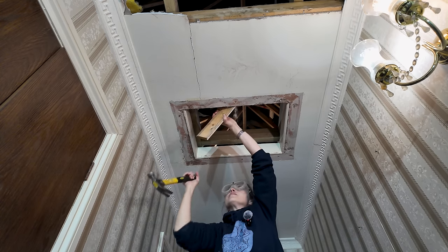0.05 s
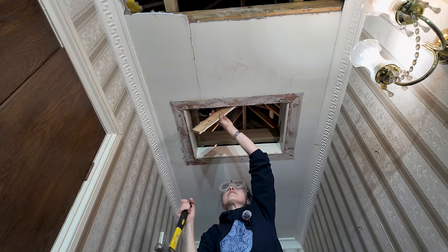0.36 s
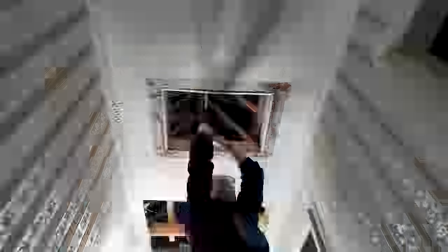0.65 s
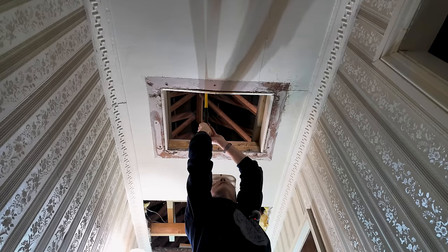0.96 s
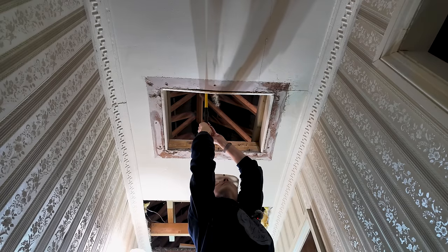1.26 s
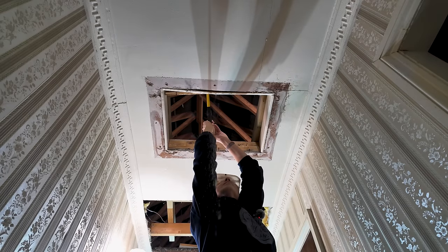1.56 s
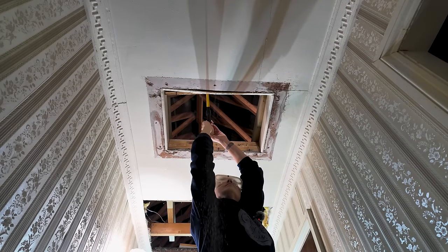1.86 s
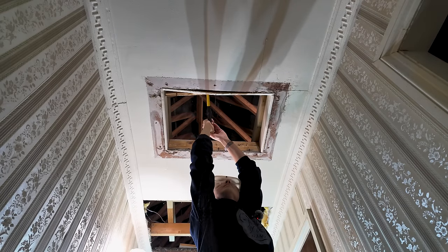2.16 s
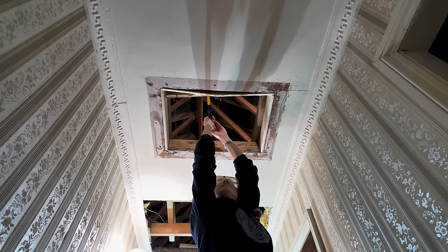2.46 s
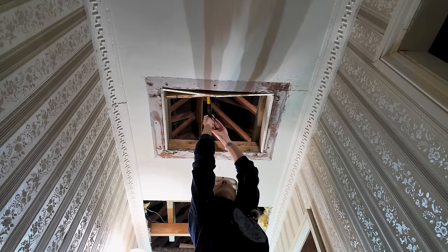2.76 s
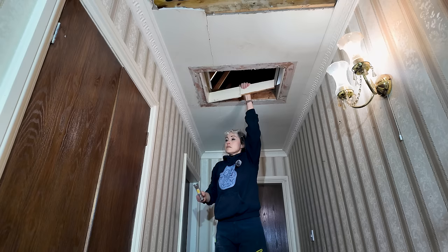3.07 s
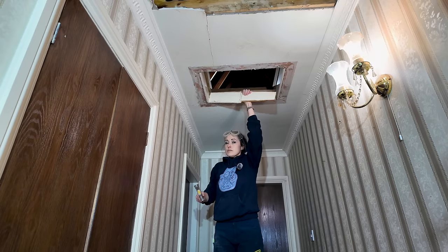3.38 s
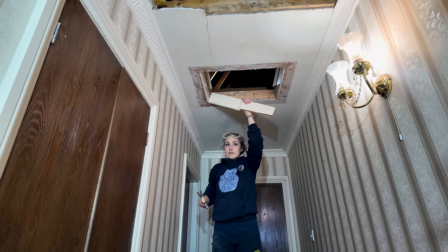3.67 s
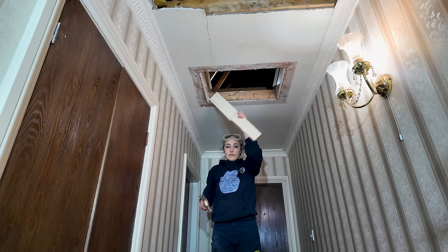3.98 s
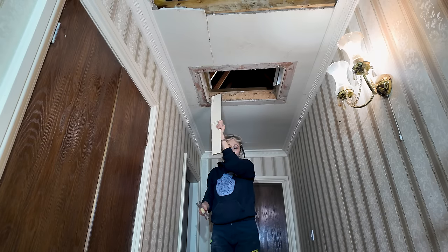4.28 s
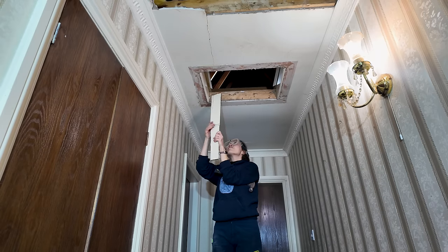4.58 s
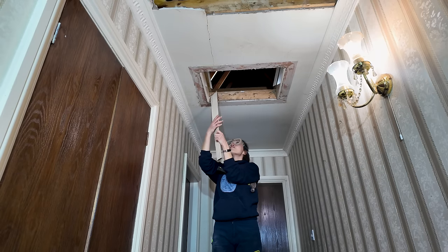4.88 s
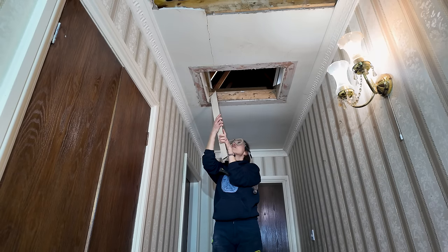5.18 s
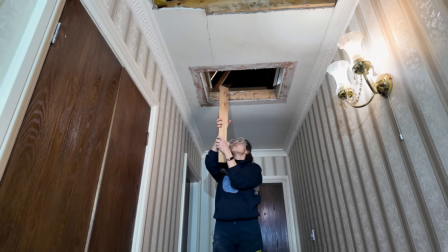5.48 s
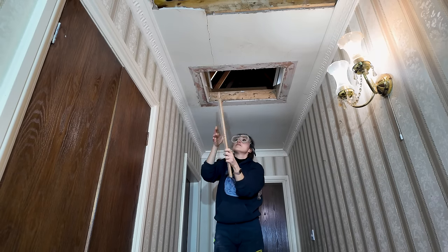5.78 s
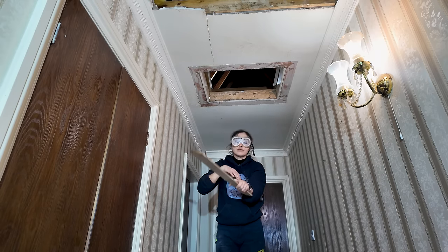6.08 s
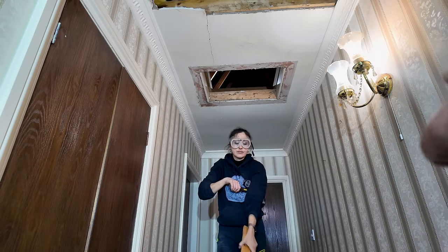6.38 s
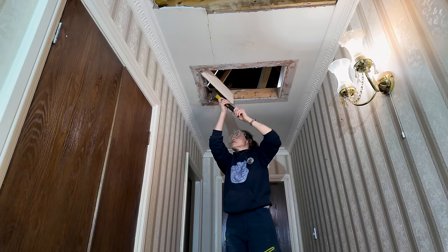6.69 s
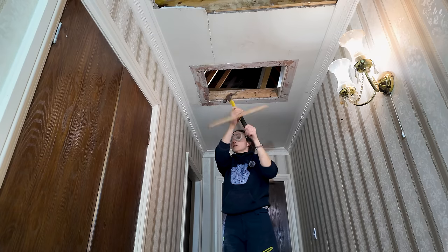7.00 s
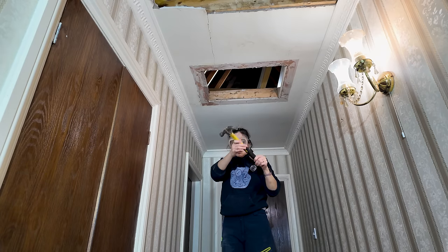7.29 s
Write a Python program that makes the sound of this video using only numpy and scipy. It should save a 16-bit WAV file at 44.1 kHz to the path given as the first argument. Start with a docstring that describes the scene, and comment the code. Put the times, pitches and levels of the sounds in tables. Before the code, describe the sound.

Nails and wood tick as a steel claw scrapes and levers at a ceiling hatch, building to a run of loud splintering cracks. The ticking resumes until the board drags loose with a brief shudder. Hollow wooden knocks and light sliding follow, then a quick ringing clatter and a small squeak on the rim. Everything echoes briefly in a tight, quiet hallway, except for soft sleeve rustles and bumps close to the microphone.

```python
"""In a narrow hallway, a claw hammer prises nailed timber out of a ceiling hatch.
The claw scrapes, the strained wood ticks, then it lets go in sharp cracks that shake the joists.
The freed board judders out, slides, is knocked about, and clatters and squeaks on the hatch rim.
The close walls echo all this; a sleeve rustles nearby over a faint hush of air."""
import sys
import numpy as np
from scipy import signal
from scipy.fft import rfft, irfft, next_fast_len
from scipy.io import wavfile
from scipy.ndimage import uniform_filter1d

SR = 44100
rng = np.random.default_rng(int(sys.argv[2]) if len(sys.argv) > 2 else 0)


def log_audio(samples):
    """Write samples as a 16-bit WAV file to the path given in sys.argv[1]."""
    # one column per channel
    frames = np.atleast_2d(samples).T
    # limit to full scale, then quantise
    limited = np.clip(frames, -1, 1)
    pcm = np.round(limited * 32767).astype(np.int16)
    wavfile.write(sys.argv[1], SR, pcm)


N = 323694
TIME = np.arange(N) / SR


def from_db(db):
    """Turn decibels into a number to multiply by."""
    return 10 ** (np.asarray(db) / 20)


def rms_one(x):
    """Scale a sound so its average strength (rms) is 1."""
    return x / np.sqrt(np.mean(x ** 2) + 1e-20)


def at_hz(points, hz):
    """Read between the rows of a table, with octaves evenly spaced."""
    pitches, values = np.transpose(points)
    return np.interp(np.log(hz + 1), np.log(pitches), values)


def add(track, start_s, sound):
    """Mix a sound into a track at the given time."""
    start = round(start_s * SR)
    track[start:start + len(sound)] += sound[:N - start]


def causal(db, size):
    """A spectrum with these levels that makes no sound before the blow (minimum phase)."""
    cepstrum = irfft(np.log(from_db(db)), size)
    cepstrum[1:size // 2] *= 2
    cepstrum[size // 2 + 1:] = 0
    return np.exp(rfft(cepstrum))


def coloured(x, colour):
    """Give a sound a colour, meaning a balance of low and high pitches, at strength 1."""
    size = next_fast_len(N)
    gains = from_db(at_hz(colour, np.fft.rfftfreq(size, 1 / SR)))
    return rms_one(irfft(rfft(x, size) * gains, size)[:N])


def ring(x, tones):
    """An object shaken by x rings at its own tones; each takes ring_s to fade by 60 dB."""
    out, x = 0, x + 1e-15 * rng.standard_normal(len(x))
    for hz, db, ring_s in tones:
        decay = from_db(-60 / (ring_s * SR))
        feedback = [1, -2 * decay * np.cos(2 * np.pi * hz / SR), decay ** 2]
        out = out + from_db(db) * (1 - decay ** 2) / 2 * signal.lfilter([1, 0, -1], feedback, x)
    return out


def strokes(rows, sharpness, level_column=0):
    """Loudness over time for rubbing strokes that each swell and fade."""
    power = np.zeros(N)
    for start_s, swell_s, fade_s, *levels_db in rows:
        effort = np.interp(TIME, start_s + np.cumsum([0, swell_s, fade_s]), [0, 1, 0])
        power += (from_db(levels_db[level_column]) * np.sin(np.pi / 2 * effort) ** sharpness) ** 2
    return np.sqrt(power)


def patches(per_s, depth_db):
    """Loudness that wanders as the pressure of a rub comes and goes."""
    pressure = rng.standard_normal(1000)
    return rms_one(from_db(depth_db * np.interp(TIME * per_s, np.arange(len(pressure)), pressure)))


def friction(colour, per_s, spread_db, smooth):
    """Surfaces stick and slip: tiny catches of uneven size over a smooth rub."""
    sizes = from_db(spread_db * np.minimum(rng.exponential(1, N), 4)) * rng.choice([-1, 1], N)
    catches = rms_one(sizes * (rng.random(N) < per_s / SR))
    return coloured(catches + smooth * rng.standard_normal(N), colour)


# colour of the background hush: pitch_hz, level_db
HUSH_COLOUR = [(25, -22), (60, -10), (120, -8), (330, 1), (700, -10.5), (1400, -24), (2800, -22),
               (8000, -28.5), (15000, -49.5)]


def air(level_db=-72):
    """The air in the hallway makes a faint, steady hush."""
    return from_db(level_db) * coloured(rng.standard_normal(N), HUSH_COLOUR)


# how long the echo takes to fade by 60 dB: pitch_hz, ring_s
ECHO_TIMES = [(100, 0.57), (260, 0.64), (700, 0.44), (1800, 0.45), (4800, 0.36), (12000, 0.46)]
# colour of the echo: pitch_hz, level_db
ECHO_COLOUR = [(80, 0), (300, 1), (1000, -3.5), (2500, -2), (7000, -7.5), (13000, -12.5), (16000, -17)]


def hallway(x, gap_s=0.002, build_s=0.0046, attic_db=-24, attic_ring_s=0.44, bands=18):
    """Echoes crowd between close walls and die away, with a faint tail from the attic."""
    t, hz = np.arange(SR) / SR, np.fft.rfftfreq(SR, 1 / SR)
    noise, centres = rfft(rng.standard_normal(SR)), np.geomspace(60, 16000, bands)
    onset = 1 - np.exp(-np.maximum(t - gap_s, 0) / build_s)
    attic = from_db(attic_db - 60 * t / attic_ring_s)
    echo = np.zeros(SR)
    for centre, weights in zip(centres, np.eye(bands)):
        share = at_hz(list(zip(centres, weights)), hz)   # picks out one band of pitches
        walls = from_db(-60 * t / at_hz(ECHO_TIMES, centre))
        band = irfft(noise * share, SR) * onset * (walls + attic)
        gain = np.sqrt(np.mean(share ** 2)) * from_db(at_hz(ECHO_COLOUR, centre))
        echo += gain * band / np.linalg.norm(band)
    return signal.fftconvolve(x, echo)[:N]


# arm movements that stir the sleeve: start_s, swell_s, fade_s, rumble_db, swish_db
ARM_MOVES = [(4.1, 0.022, 0.13, -58, -57), (4.19, 0.13, 0.059, -54.5, -61.5),
             (4.43, 0.042, 0.19, -62.5, -81.5), (4.6, 0.19, 0.31, -59, -70.5), (5.03, 0.12, 0.33, -59, -67),
             (5.58, 0.16, 0.41, -65, -68), (5.96, 0.23, 0.9, -63.5, -56.5), (6.28, 0.2, 0.089, -69, -63.5),
             (6.85, 0.07, 0.2, -73.5, -72), (7.12, 0.34, 0.17, -78.5, -72)]
# colours of the cloth's rumble and swish: pitch_hz, level_db
CLOTH_RUMBLE = [(25, 0), (55, 24), (130, 19.5), (300, 17), (700, -33)]
CLOTH_SWISH = [(120, -35), (200, -18), (245, -16), (278, 0), (311, -5), (538, 0), (1000, -9), (2910, -15),
               (7010, -23), (13100, -38), (16000, -52)]
# dull bumps of cloth and hands: start_s, peak_db, pitch_hz
SOFT_BUMPS = [(4.47, -44, 170), (4.727, -42, 210), (4.776, -41.5, 220.5), (5.075, -36.5, 300),
              (5.267, -38, 262), (5.799, -45, 170.5), (6.053, -41.5, 300), (6.22, -24.5, 310),
              (6.236, -32, 284)]


def sleeve(undertone_ratio=0.37, bump_s=0.0036, rise_s=0.003):
    """Moving cloth rumbles and swishes, and now and then bumps with a short, dull throb."""
    rumble = strokes(ARM_MOVES, sharpness=0.75) * patches(per_s=22, depth_db=2.0)
    rumble *= coloured(rng.standard_normal(N), CLOTH_RUMBLE)
    swish = friction(CLOTH_SWISH, per_s=2800, spread_db=5.0, smooth=0.91)
    cloth = rumble + from_db(2.5) * strokes(ARM_MOVES, sharpness=1.0, level_column=1) * swish
    t = np.arange(SR // 10) / SR
    for start_s, peak_db, pitch_hz in SOFT_BUMPS:
        phase = 2 * np.pi * pitch_hz * t
        throb = np.sin(phase) - 0.89 * np.sin(undertone_ratio * phase)
        throb *= (1 - np.exp(-t / rise_s)) * np.exp(-t / bump_s)
        add(cloth, start_s, from_db(peak_db) * throb / np.abs(throb).max())
    return cloth


# the board sliding over timber and hands, and squeaking, then a faint, bright closing rustle: start_s, swell_s,
# fade_s, level_db
SLIDE_STROKES = [(0.0, 0.0017, 0.088, -53.5), (0.065, 0.021, 0.09, -49), (0.245, 0.0074, 0.056, -53.5),
                 (0.39, 0.013, 0.074, -52), (0.55, 0.069, 0.083, -40.5), (4.6, 0.013, 0.024, -67),
                 (4.7, 0.038, 0.08, -64.5), (4.8, 0.08, 0.09, -63.5), (5.18, 0.072, 0.066, -54.5),
                 (6.98, 0.27, 0.25, -64.5)]
SQUEAK_STROKES = [(6.81, 0.078, 0.1, -56)]
# colour of the rub: pitch_hz, level_db
RUB_COLOUR = [(47, -46), (80, -25), (108, -5.5), (257, -11), (355, -2.5), (387, -8), (471, -11.5),
              (637, -6.5), (920, -3.5), (1240, -11.5), (1920, -16), (2280, -12), (4750, -17), (9290, -19.5),
              (14000, -46)]
# tones of the slide and of the squeak: pitch_hz, level_db, ring_s
SLIDE_TONES = [(468, 9.5, 0.067), (945, -6.5, 0.025), (1220, 4.5, 0.084), (2196, -7.5, 0.011),
               (4330, 1, 0.043), (9760, -8.5, 0.005)]
SQUEAK_TONES = [(1139, 2, 0.15), (2400, -25, 0.038), (3270, -15, 0.049), (4500, -17, 0.004)]


def sliding_board():
    """The board rubs along with a hollow tone, and squeaks where it is pressed on the rim; a faint, bright
    rustle closes the scene."""
    rub = from_db(-7) * strokes(SLIDE_STROKES, sharpness=1.6)
    rub *= friction(RUB_COLOUR, per_s=4000, spread_db=5.0, smooth=1.0)
    squeak = from_db(-2) * strokes(SQUEAK_STROKES, sharpness=2.0)
    squeak *= rms_one(ring(rng.standard_normal(N), SQUEAK_TONES))
    return rub + ring(rub, SLIDE_TONES) + squeak


# loudness of the freed board as it is dragged out: time_s, level_db
GROAN_LEVELS = [(4.045, -57), (4.06, -42), (4.12, -32.5), (4.135, -44), (4.2, -54.5), (4.365, -52.5),
                (4.38, -100)]
# the tones it groans with: pitch_hz, level_db, ring_s
GROAN_TONES = [(119.5, -5, 0.17), (208.2, 9, 0.12), (297, 9, 0.15), (378, 1.5, 0.3), (640, -22, 0.26)]


def juddering_board(slips_per_s=98, jitter=0.086, count=48):
    """The board catches and slips in quick succession, and each slip rings its low tones."""
    slips = np.zeros(N)
    times = GROAN_LEVELS[0][0] + np.cumsum(1 + jitter * rng.standard_normal(count)) / slips_per_s
    slips[(times * SR).astype(int)] = 1
    groan = signal.sosfilt(signal.butter(2, 1500, fs=SR, output="sos"), ring(slips, GROAN_TONES))
    groan = rms_one(groan) * np.sqrt(count / slips_per_s / TIME[-1])   # strength 1 while it sounds
    return from_db(np.interp(TIME, *np.transpose(GROAN_LEVELS))) * groan


# the claw and nails scraping on wood, with a loud splintering tear just before a crack at 1.6 s: start_s,
# swell_s, fade_s, level_db
CLAW_STROKES = [(0.32, 0.032, 0.049, -65.5), (0.45, 0.089, 0.044, -62.5), (0.74, 0.12, 0.099, -54.5),
                (1.02, 0.18, 0.034, -53.5), (1.45, 0.041, 0.15, -55.5), (1.605, 0.047, 0.11, -29.5),
                (1.96, 0.04, 0.22, -70), (2.25, 0.19, 0.036, -55.5), (3.08, 0.14, 0.17, -58.5),
                (3.33, 0.12, 0.1, -66), (3.85, 0.028, 0.036, -53), (3.88, 0.088, 0.12, -43.5),
                (4.07, 0.063, 0.12, -50)]
# colour of the scrape: pitch_hz, level_db
CLAW_COLOUR = [(88, -34), (150, -7.5), (383, -2), (566, -5), (1900, -6.5), (3550, 0), (3840, -8),
               (4760, -7), (5680, -1), (7320, -5), (9440, -9), (11700, -19), (16000, -37.5)]


def claw():
    """Steel dragging on wood fibres crackles in uneven patches; once the fibres splinter loudly just before a
    crack."""
    crackle = friction(CLAW_COLOUR, per_s=1400, spread_db=3.6, smooth=0.5)
    pressure = strokes(CLAW_STROKES, sharpness=3.1) * patches(per_s=120, depth_db=1.0)
    return from_db(0.5) * pressure * crackle


# colour of the timber under any blow: pitch_hz, level_db
WOOD_COLOUR = [(40, -28.5), (90, -13.5), (150, -5.5), (330, 1), (800, 0), (1150, -3.5), (2000, -4),
               (2850, 0), (3300, -1), (4450, 1.5), (5300, 4.5), (6500, 6.5), (9000, 1.5), (11000, -3.5),
               (16000, -24)]


def blows(rows, contact, tones, note_db, note_cycles, splinter_s, note_growth=0):
    """A blow is a spike, tearing fibres and a dull shudder. Gives direct sound and sound to echo."""
    size, spike = 16384, 0.31
    shudder_s, shudder_hz, fastest_hz = 0.011, 1000, 6500
    t, hz = np.arange(size) / SR, np.fft.rfftfreq(size, 1 / SR)
    direct, to_room = np.zeros(N), np.zeros(N)
    octaves = np.log2(np.clip(hz, 220, 9500) / 1500)   # harder contact: more treble, less bass
    bass = 1 / (1 + (hz / 350) ** 2)   # where shaken joists thud
    colour_db = at_hz(contact, hz) + at_hz(WOOD_COLOUR, hz)
    # as a bend travels through wood, the treble arrives first and the bass trails
    slowness = np.maximum(np.sqrt(1000 / (hz + 300)) - np.sqrt(1000 / fastest_hz), 0)
    fade = np.minimum(1, np.linspace(3, 0, size)) ** 2
    for start_s, level_db, brightness, pitch_hz, travel_ms, room_db, thud_db in rows:
        bursts = [rng.standard_normal(size) * np.exp(-t / life) for life in (splinter_s, shudder_s)]
        fibres, shudder = (rfft(rms_one(burst)) / np.sqrt(size) for burst in bursts)
        force = spike + fibres + 2 * shudder / (1 + 1j * hz / shudder_hz) ** 2
        force /= np.sqrt(uniform_filter1d(np.abs(force) ** 2, size // 48))   # even out broad humps
        wood = causal(level_db + brightness * octaves + thud_db * bass + colour_db, size)
        lag = np.cumsum(travel_ms / 1000 * slowness) * SR / size
        wood *= np.exp(-2j * np.pi * lag)
        # the struck piece sings on at its own pitch; note_growth makes hard blows sing more
        cycles = note_cycles * (pitch_hz / 200) ** 0.25
        sing_db = note_db + note_growth * level_db + 10 * np.log10(cycles / np.log(1000))
        note = [(pitch_hz, sing_db, cycles / pitch_hz)]
        # the room gathers sound from all directions, so it gets a smoother spectrum
        gathered = causal(10 * np.log10(np.abs(force) + 1e-3), size) * from_db(room_db)
        for track, push in ((direct, force), (to_room, gathered)):
            sound = irfft(wood * push, size)
            add(track, start_s, (sound + ring(sound, note)) * fade)
    return direct + ring(direct, tones), to_room


def same_spot(rows, travel_ms, room_db, thud_db=0):
    """Blows at one spot share their path through the wood, their echo level and their thud."""
    return [(*row, travel_ms, room_db, thud_db) for row in rows]


# knocks on the board: start_s, level_db, brightness_db_per_octave, pitch_hz
KNOCK_HITS = [(0.251, -25, -4, 390), (0.406, -28, 2.5, 1030), (4.441, -31.5, -3.5, 338),
              (4.633, -26, -0.5, 850), (4.867, -23, -3, 850), (5.074, -24.5, -3.5, 329),
              (5.25, -18.5, 2, 370), (5.387, -21, 1, 344), (5.476, -3, -6.5, 353), (5.485, 4, -3, 793),
              (5.926, -27, 4, 1100), (5.993, -30.5, 9, 360), (6.003, -24.5, 2.5, 370)]
# colour of a knock: pitch_hz, level_db
KNOCK_COLOUR = [(220, -1), (700, 5), (1500, -0.5), (3100, -1), (4500, -12), (9500, -21), (15000, -26)]
# the board's own tones: pitch_hz, level_db, ring_s
BOARD_TONES = [(216, -41, .3), (347, 9, 0.17), (452, 7, 0.32), (517, -1, 0.082), (617, 8.5, 0.23),
               (726, 5, 0.055), (880, -12, 0.052), (928, 3, 0.33), (2316, 5, 0.026), (3330, 3, 0.023)]


def board_knocks():
    """The hand-held board rings briefly each time it is knocked."""
    hits = same_spot(KNOCK_HITS, travel_ms=0.85, room_db=-2.0)
    return blows(hits, KNOCK_COLOUR, BOARD_TONES, note_db=2.5, note_cycles=23, splinter_s=0.0035)


# hits on the hatch rim: start_s, level_db, brightness_db_per_octave, pitch_hz
RIM_HITS = [(6.67, -3.5, 0, 1270), (6.679, -6, -4, 324), (6.692, -12.5, -4.5, 332), (6.708, -7, 2.5, 3280),
            (6.735, -5.5, 1.5, 1330), (6.78, -13, 1.5, 1270), (6.846, -16, 0, 1130), (7.149, -29.5, 5, 481),
            (7.235, -20.5, 3, 1105)]
# colour of a hit: pitch_hz, level_db
RIM_COLOUR = [(220, 0), (750, -6.5), (3200, -9.5), (9500, -20)]
# the rim's own tones: pitch_hz, level_db, ring_s
RIM_TONES = [(105, 34.3, 0.45), (348, 18.2, 0.14), (662, 15.2, 0.23), (1180, 14.4, 0.22),
             (1357, 14.6, 0.15), (2024, 15.4, 0.15), (2290, 3.8, 0.77), (3070, 6.1, 0.22),
             (3450, 11.6, 0.11), (4560, 5.4, 0.27)]


def rim_clatter():
    """The board clatters against the hatch rim and sets it ringing."""
    hits = same_spot(RIM_HITS, travel_ms=2.97, room_db=2.4)
    return blows(hits, RIM_COLOUR, RIM_TONES, note_db=3.5, note_cycles=31, splinter_s=0.0046)


# ticks of nails and wood, then of the board snagging as it is drawn out: start_s, level_db,
# brightness_db_per_octave, pitch_hz
STRAIN_TICKS = [(0.717, -40, 4, 2900), (0.76, -26.5, 6, 2790), (0.78, -17, 0.5, 2800),
                (0.877, -10.5, 2.5, 2980), (0.946, -14, -0.5, 3140), (1.053, -25, 2.5, 2900),
                (1.068, -14.5, 1, 3100), (1.084, -7.5, 1, 2940), (1.182, -18.5, -7.5, 190),
                (1.197, -17.5, 1.5, 180), (1.55, -19, 1.5, 2960), (1.604, -8.5, 0.5, 2830),
                (2.075, -32.5, 1.5, 2900), (2.1005, -6.5, -2.5, 2910), (2.83, -10.5, 0.5, 2800),
                (3.015, -21, -4, 2940), (3.147, -23, -0.5, 2900), (3.171, -21, -2.5, 2890),
                (3.196, -19.5, 1.5, 2950), (3.216, -14, 2, 3190), (3.261, -9.5, 0, 3130),
                (3.322, -19.5, -1, 2810), (3.423, -23, -2.5, 2870), (3.56, -18.5, 2, 3210),
                (3.491, -25.5, -2, 2920), (3.649, -21, 2, 3120), (3.66, -3.5, -0.5, 3185),
                (3.853, -26, 2, 3170), (3.862, -21, 4.5, 3270), (3.918, 0.5, -1, 3480),
                (3.957, -9.5, 4, 3340), (3.962, -4.5, -3.5, 3050), (4.008, -6.5, 1.5, 3130),
                (4.018, 2, -1, 3060)]
# colour of a tick: pitch_hz, level_db
TICK_COLOUR = [(220, -2.5), (750, -1.5), (3200, -1.5), (9500, -6.5), (15000, -8.5)]
# tones of the joists (ceiling beams), rung by ticks and cracks: pitch_hz, level_db, ring_s
JOIST_TONES = [(71.5, 9, 1.8), (121, 2.5, 1.2), (151.3, 10, 0.44), (179, 9, 0.54), (334, 5.5, 0.34),
               (513, -1, 0.42), (2745, -2, 0.038), (4480, -3.5, .1)]


def wood_ticks():
    """Nails and wood tick under the strain of the claw; later the board ticks as it snags on the frame while it
    is dragged out."""
    hits = same_spot(STRAIN_TICKS, travel_ms=2.8, room_db=1.15)
    return blows(hits, TICK_COLOUR, JOIST_TONES, note_db=2.5, note_cycles=49, splinter_s=0.0025,
                 note_growth=0.27)


# the timber letting go:
# start_s, level_db, brightness_db_per_octave, pitch_hz, travel_ms, room_db, thud_db
CRACKS = [(1.215, 15.5, -1.5, 675, 1.27, -2.5, -8), (1.636, 13, -1, 301.5, 4.8, 2.5, 0),
          (1.644, 11.5, 0, 183, 3.9, -8.5, 7), (2.12, 2.5, -5, 180.3, 4.5, -1, -0.5),
          (2.472, 18, 0, 716, 8.8, -1.5, 0), (2.516, 16, 1.2, 371, 10, 1.5, -1.5),
          (2.6985, 14, 1.4, 155, 9.7, 2, 6.5), (4.05, -5, -7.5, 324.6, 2.62, 2, 4.5)]
# colour of a crack: pitch_hz, level_db
CRACK_COLOUR = [(30, -14), (80, -1), (220, -1), (700, 0), (1100, -2), (1800, 3), (3200, 1.5), (4500, 0.5),
                (5200, -8.5), (5800, -4.5), (6700, -6.5), (7700, -11), (9500, -12.5), (13000, -17),
                (16000, -29.5)]


def timber_cracks():
    """The nailed timber lets go in sharp cracks that shake the joists."""
    return blows(CRACKS, CRACK_COLOUR, JOIST_TONES, note_db=-0.5, note_cycles=41, splinter_s=0.0032)


def scene():
    """Blows and scrapes echo in the hallway; the sleeve is close and has no echo."""
    direct, to_room = np.sum([timber_cracks(), wood_ticks(), board_knocks(), rim_clatter()], axis=0)
    hush = air()
    rubbing, groan = claw() + sliding_board(), juddering_board()
    echo = hallway(to_room + from_db(-2.5) * rubbing + from_db(-17) * groan)
    return (direct + rubbing + groan + echo + sleeve() + hush)[None]


def record(dry, ceiling=0.8, cutoff_hz=16000):
    """Round off the loudest peaks and cut the highest treble."""
    rounded = ceiling * np.tanh(dry / ceiling)
    return signal.sosfilt(signal.ellip(10, 0.1, 80, cutoff_hz, fs=SR, output="sos"), rounded)


dry = scene()
out = record(dry)
log_audio(out)
```